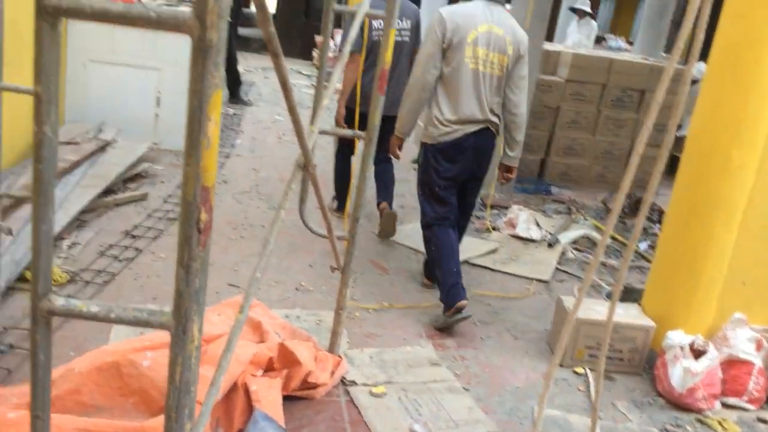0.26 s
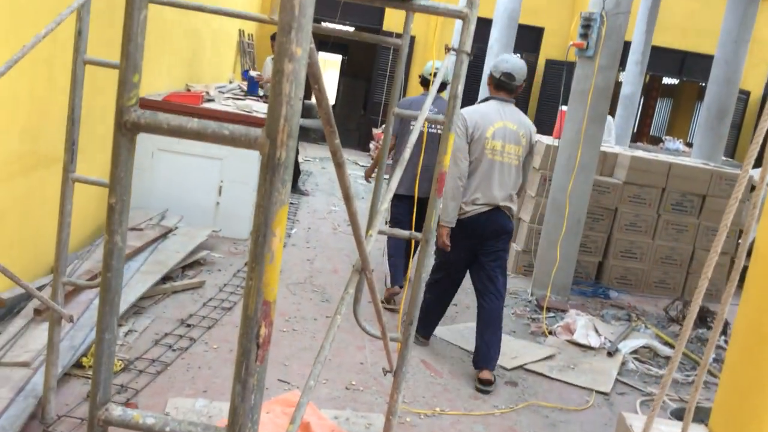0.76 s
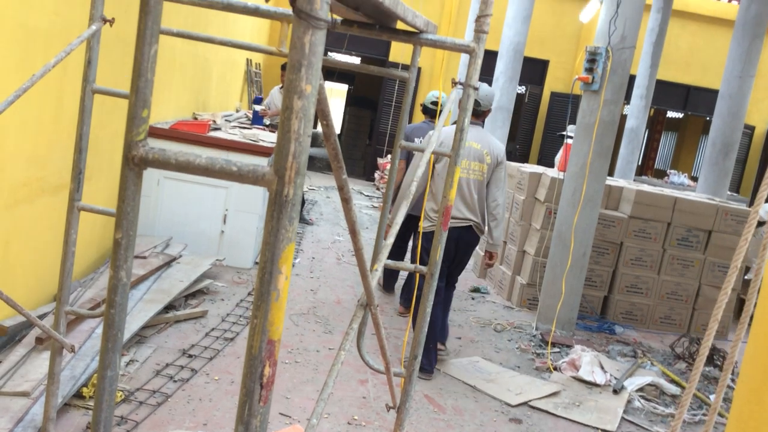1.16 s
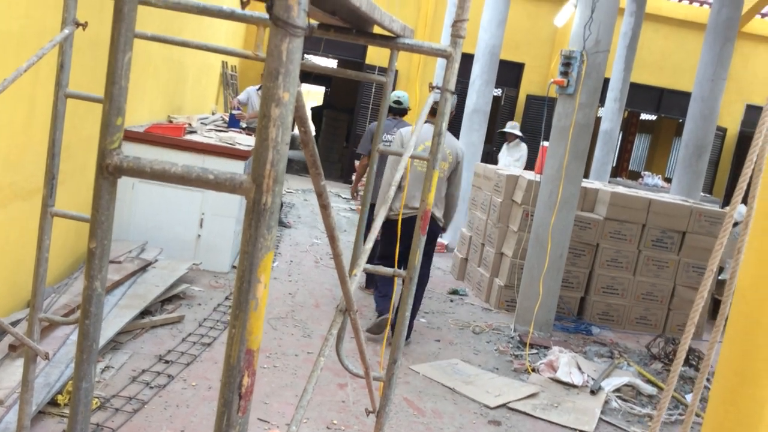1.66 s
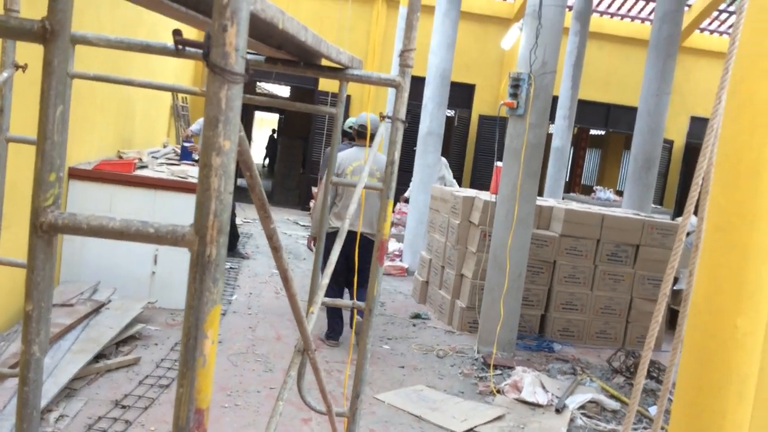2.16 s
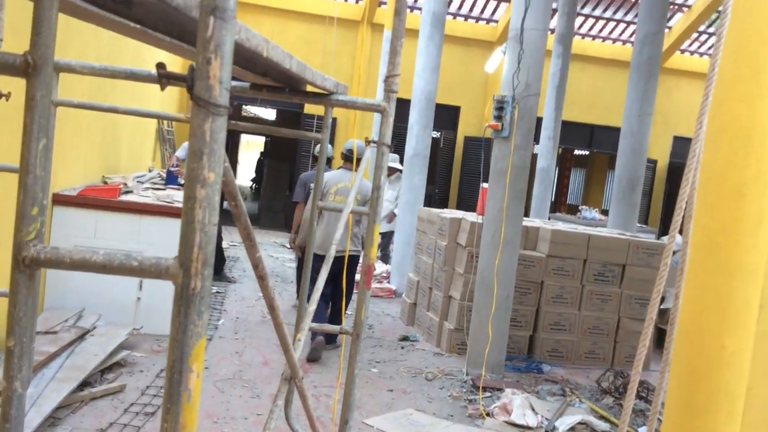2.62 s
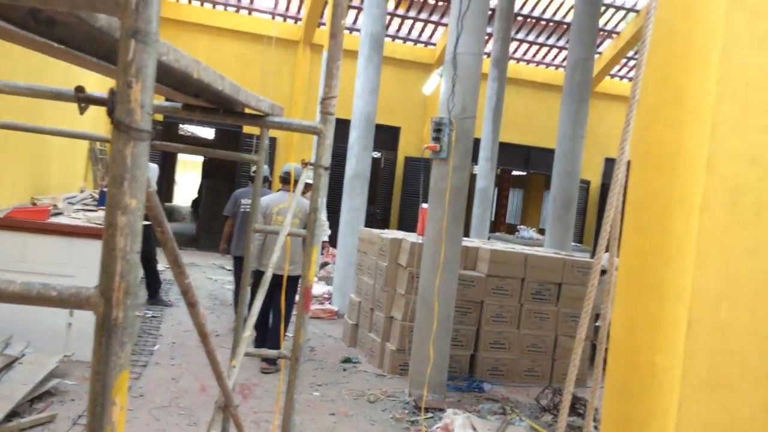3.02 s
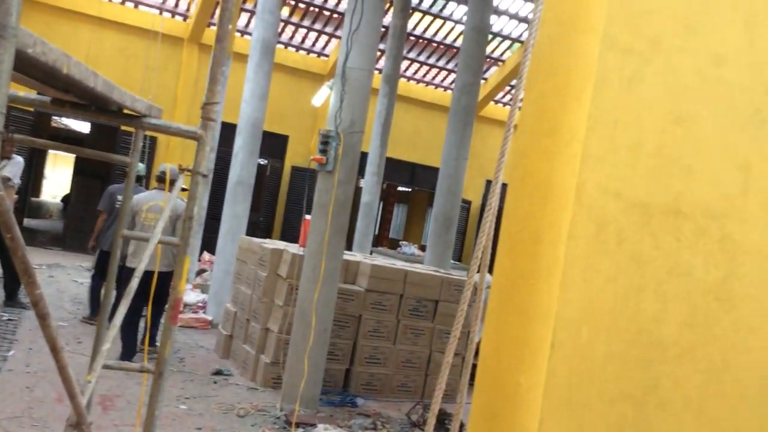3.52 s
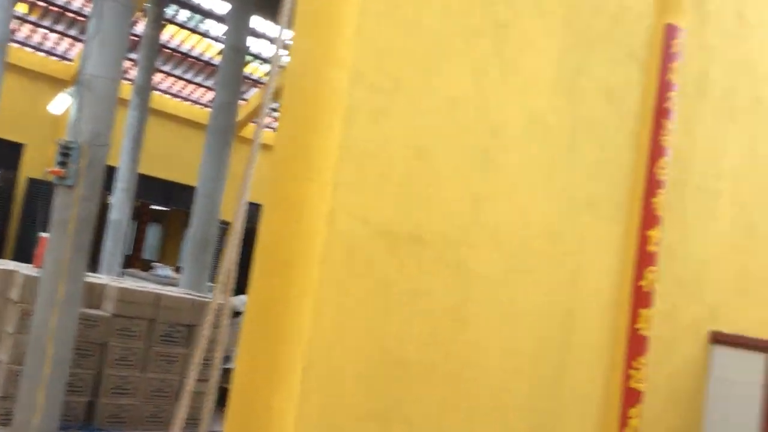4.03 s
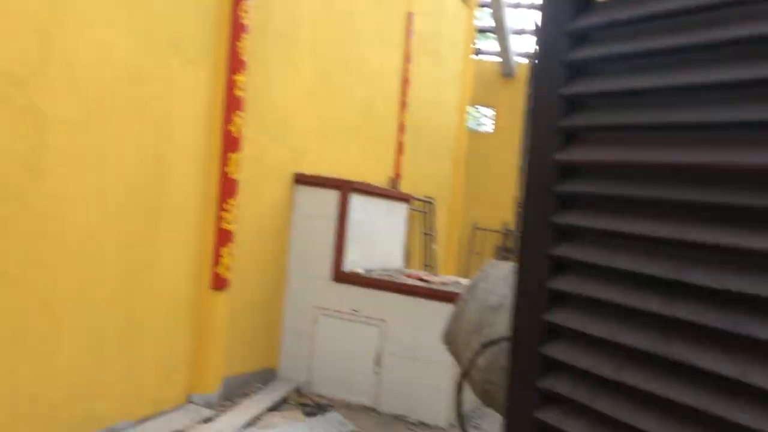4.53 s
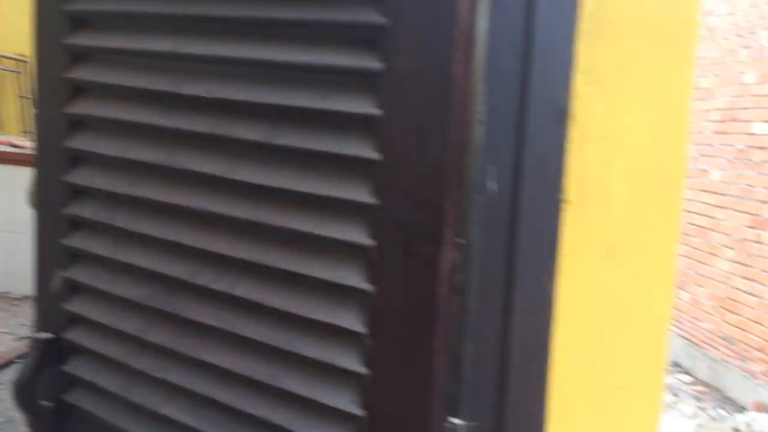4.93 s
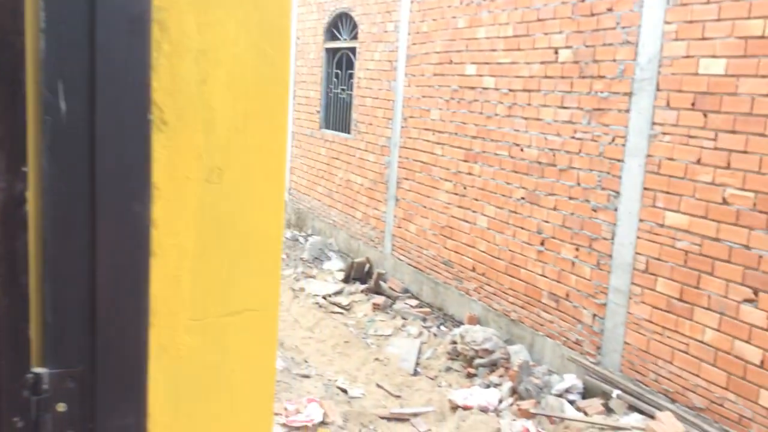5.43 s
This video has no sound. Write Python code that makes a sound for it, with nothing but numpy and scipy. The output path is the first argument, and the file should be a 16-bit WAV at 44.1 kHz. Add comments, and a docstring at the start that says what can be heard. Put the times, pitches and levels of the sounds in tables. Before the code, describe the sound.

Sharp, irregular hammering on timber rings in a bare building-site hall, with barely audible footsteps and grit scuffs under a quiet airy hiss.

```python
"""Sharp knocks, most likely a hammer on timber, ring through an unfinished hall on a building site.
A run on hollow boards, softer blows further off, then three bright ones on a solid piece close by.
Each blow is a noise crack with decaying modes and a diffuse echo. Shoes bump and scrape faintly on grit
as bursts of shaped noise, and a last long, soft swell of hiss is made alike. Two very faint, thin high
tones are sines that slide down, and the site's hiss is coloured noise."""
import sys
import numpy as np
from scipy import signal
from scipy.fft import rfft, irfft, next_fast_len
from scipy.io import wavfile
from scipy.ndimage import uniform_filter1d

SR = 44100
rng = np.random.default_rng(int(sys.argv[2]) if len(sys.argv) > 2 else 0)


def generate_wav(signal):
    """Clip the signal to [-1, 1] and save it as 16-bit WAV at the path in sys.argv[1]."""
    frames = np.transpose(np.atleast_2d(signal))
    scaled = np.clip(frames, -1, 1) * 32767
    pcm = np.round(scaled).astype(np.int16)
    wavfile.write(sys.argv[1], SR, pcm)


N = 250488
RING = SR * 2 // 3  # samples kept of each blow
AGE = np.arange(RING) / SR  # time since a contact, s

# Hammer blows and light placing taps on the hollow boards.
# Each row: start in seconds, level in dB, snap (treble lift) in dB, knock in Hz, knock gain in dB.
BOARD_BLOWS = [(-0.012, -18.5, -9, 177, 4.5), (0.3475, -15, 3, 1220, 1), (0.6703, -14, -1.5, 885, 4),
               (0.9425, -17.5, 3, 950, 5.5), (1.179, -37, -28, 1010, -1), (1.381, -36.5, -4.5, 920, 1.5),
               (1.602, -32.5, -3, 550, 8), (1.6235, -16, -1, 900, 7.5), (1.787, -36, -10, 860, 5),
               (1.853, -20.5, 2, 654, 0.5), (1.962, -32, -1, 1010, 0.5)]
# Blows on the distant timber. Each row: start in seconds, level in dB, snap in dB, knock in Hz, its gain in dB.
FAR_BLOWS = [(2.906, -27, -11.5, 1400, 4), (3.174, -26.5, -10, 496, 1), (3.396, -36, -22, 1070, 9),
             (3.412, -26, -9.5, 1080, 2.5)]
# Blows on the nearby beam. Each row: start in seconds, level in dB, snap in dB, knock in Hz, its gain in dB.
BEAM_BLOWS = [(4.7605, -23, 4.5, 750, 9.5), (5.149, -19.5, 7, 2590, 1.5), (5.512, -18, 10.5, 498, 6)]
# A light placing tap before the far blows, then heels landing on the floor. Each row: start in seconds, level
# in dB, snap in dB, knock in Hz, its gain in dB.
TAP_AND_HEELS = [(2.605, -42, 13, 690, 17), (4.378, -38.5, 11.5, 370, 6), (4.968, -48, -2, 190, 1)]
# Soles scraping over grit, and a last long, soft swell of hiss.
# Each row: middle in seconds, level in dB, spread (Gaussian sigma) in seconds.
SCUFFS_AND_SWELL = [(1.471, -48, 0.023), (1.963, -43.5, 0.082), (2.465, -53, 0.01), (2.67, -50.5, 0.049),
                    (3.938, -53, 0.14), (5.345, -50, 0.2)]
# Single bits of grit cracking. Each row: start in seconds, level in dB, centre in Hz.
GRIT = [(2.015, -51.5, 8800), (2.342, -56, 9400), (4.044, -44.5, 5000)]
# Spectrum of the crowd of short-lived modes of the boards. Each row: frequency in Hz, relative level in dB.
BOARD_SPECTRUM = [(60, -27), (120, -11), (168, 1), (228, -2.5), (295, -3), (360, -4), (660, -3),
                  (900, -5.5), (1100, -6), (2300, -6.5), (3700, -8), (5000, -17.5), (9500, -27.5),
                  (16000, -44.5)]
# The same for the distant timber. Each row: frequency in Hz, relative level in dB.
FAR_SPECTRUM = [(60, -14), (165, 3), (235, -1.5), (400, -3), (660, -2.5), (830, -6), (1100, -4),
                (2200, -11), (2700, -9.5), (5100, -13), (8100, -17), (16000, -35)]
# The same for the nearby beam. Each row: frequency in Hz, relative level in dB.
BEAM_SPECTRUM = [(60, -26), (155, -4.5), (200, -6.5), (420, -3.5), (540, -5.5), (880, -10.5), (1100, -4.5),
                 (1800, -11), (2550, -4.5), (3000, -10.5), (4000, -10.5), (5400, -17.5), (9400, -27),
                 (16000, -52)]
# The same for heel and floor. Each row: frequency in Hz, relative level in dB.
HEEL_SPECTRUM = [(35, -32), (60, -2), (198, 7), (503, -18), (682, -14), (841, -26), (1510, -11),
                 (5090, -28), (16000, -50)]
# Modes that stand out on the boards. Each row: mean frequency in Hz, relative level in dB, t60 in seconds.
BOARD_MODES = [(170.5, 3.5, 0.35), (296, 2.5, 0.16), (528, -9.5, 0.2), (660, -3.5, 0.27), (874, 4.5, 0.064),
               (1259, -6, 0.17), (1472, -6, 0.19), (1597, -11, 0.4), (2140, -14, 0.66), (2353, -11.5, 0.37),
               (3200, -28, .25), (3500, 2, 0.045), (3710, -0.5, 0.079)]
# Modes of the distant timber. Each row: mean frequency in Hz, relative level in dB, t60 in seconds.
FAR_MODES = [(400, 1, 0.39), (474, -8, 0.6), (675, -2.5, 0.47), (1138, -4, 0.25), (1695, -6, 0.15),
             (2630, -5, 0.13)]
# Modes of the nearby beam. Each row: mean frequency in Hz, relative level in dB, t60 in seconds.
BEAM_MODES = [(295.6, -9.5, 0.37), (400, 0.5, 0.12), (545.5, 5, 0.092), (760, -5, 0.072), (1140, -32, 0.17),
              (2270, -20, 0.14), (2580, -20, 0.058), (3270, -17, .15), (3755, -4, 0.036), (4160, 5, 0.024),
              (4370, -24, 0.068)]
# Echo of the hall. Each row: band in Hz, relative share in dB, t60 in seconds before each place stretches it.
HALL = [(59, -9, 1), (162, 4.5, 0.79), (400, 3.5, 0.71), (1020, 2, 0.64), (2170, 2.5, 0.7),
        (4570, -2, 0.69), (9500, 1, 0.49), (16000, -21, 0.57)]
# Spectrum of the site's air. Each row: frequency in Hz, relative density in dB per Hz.
AIR_SPECTRUM = [(15, -60), (25, -24), (53, -1), (145, -7), (180, -5.5), (363, -7), (489, -13), (575, -12.5),
                (1790, -12), (1940, -12), (4030, -18.5), (9310, -27.5), (16000, -45)]
# Level of the air, lowest in the middle and rising at the open doorway. Each row: time in seconds, level in dB.
AIR_LEVEL = [(1.4, -49), (2.3, -53.5), (4.3, -53), (5.4, -49.5), (5.68, -44)]
# Very faint, thin high tones that slide down.
# Each row: start in seconds, length in seconds, start in Hz, end in Hz, peak level in dB.
THIN_TONES = [(4.58, 0.15, 9600, 9200, -67), (4.65, 0.051, 5400, 5000, -58)]

# a weaker blow loses bite and a little bass: dB of treble and of bass per dB of level
BITE_DB_PER_DB, THUMP_DB_PER_DB = 0.97, 0.05
# finer grit cracks at random moments
FINE_GRIT_COUNT, FINE_GRIT_DB, FINE_GRIT_HZ = 7, -60.5, 9500
TOP_HZ = 16100  # upper limit of the recorder


def undb(db):
    """Decibels to gain."""
    return 10 ** (np.asarray(db) / 20)


def unit(x):
    """Scale to rms 1."""
    return x / np.sqrt(np.mean(x ** 2))


def on_log(hz, points, values):
    """Read a curve on a log-frequency axis."""
    return np.interp(np.log(np.maximum(hz, 1)), np.log(points), values)


def colour(x, points, db):
    """Filter by a smooth spectrum, causally (minimum phase), so that attacks stay sharp."""
    size = next_fast_len(len(x) + SR // 10, True)
    size += size % 2
    bins = np.fft.rfftfreq(size, 1 / SR)
    # folding the cepstrum onto positive times gives minimum phase
    cepstrum = irfft(np.log(undb(on_log(bins, points, db))))
    cepstrum[1:size // 2] *= 2
    cepstrum[size // 2 + 1:] = 0
    response = np.exp(rfft(cepstrum))
    return irfft(rfft(x, size) * response)[:len(x)]


def fade(t60):
    """Exponential decay, 60 dB down after t60."""
    return np.exp(-np.log(1000) * AGE / t60)


def add(out, s, sound):
    """Mix a sound in from time s, dropping whatever falls outside."""
    start = int(round(s * SR))
    sound, start = sound[max(-start, 0):], max(start, 0)
    out[start:start + len(sound)] += sound[:len(out) - start]


def hall_tail(stretch):
    """Diffuse echo of one impulse: noise bands build up together, then each dies at its own rate."""
    hz, share_db, t60 = np.transpose(HALL)
    noise = rfft(rng.standard_normal(RING))
    bins = np.fft.rfftfreq(RING, 1 / SR)
    bands = [irfft(noise * on_log(bins, hz, pick)) for pick in np.eye(len(hz))]
    tail = sum(band * undb(db) * fade(t * stretch) for band, db, t in zip(bands, share_db, t60))
    return tail * (1 - np.exp(-AGE / 0.009))


def ring_mode(hz, db, t60, swing_cycles):
    """One clear mode: a decaying sine that takes a number of cycles to swing up."""
    # each mode's pitch, share and phase vary at random from blow to blow
    detune, share, turn = rng.standard_normal(3)
    swing = np.sin(2 * np.pi * (hz * (1 + 0.0049 * detune) * AGE + turn))
    swing_up = 1 - np.exp(-(AGE * hz / swing_cycles) ** 2)
    return undb(db + 2.9 * share) * swing * swing_up * fade(t60)


def strikes(blows, body, modes, rise_s, body_t60, modes_db, swing_cycles, hall_db, stretch, low_cut_hz,
            firm_db, thump_db):
    """Each blow sets off a dense, fast-dying crack, any clear modes and the hall; below firm_db it dulls."""
    out = np.zeros(N)
    attack = slice(0, SR // 25)  # levels are set over the first 40 ms
    own = rng.standard_normal(RING)  # the part of the crack that is alike each time
    # a steep low cut thins the bass
    low_cut = signal.butter(4, low_cut_hz, "high", fs=SR, output="sos")
    for s, db, snap_db, knock_hz, knock_db in blows:
        crack = own + rng.standard_normal(RING)
        crack *= fade(body_t60) * (1 - np.exp(-AGE / rise_s))
        sound = colour(crack + undb(hall_db) * hall_tail(stretch), *np.transpose(body))
        sound /= np.std(sound[attack])
        for hz, mode_db, t60 in modes:
            sound += ring_mode(hz, modes_db + mode_db, t60, swing_cycles)
        # each spot has its own hollow knock
        knock = signal.lfilter(*signal.iirpeak(knock_hz, 4.5, fs=SR), sound)
        sound += (undb(knock_db) - 1) * knock
        # a harder hit has more bass and bite, a squarer one more snap
        bass_db = thump_db + THUMP_DB_PER_DB * (db - firm_db)
        bite_db = BITE_DB_PER_DB * (db - firm_db)
        sound = colour(sound, [170, 400, 1100, 3000, 8500], [bass_db, 0, 0, bite_db, snap_db])
        sound = signal.sosfilt(low_cut, sound)
        add(out, s, undb(db) * sound / np.std(sound[attack]))
    return out


def hollow_boards():
    """Hammer on hollow boards: a long crack and many clear modes."""
    return strikes(BOARD_BLOWS, BOARD_SPECTRUM, BOARD_MODES, rise_s=0.0011, body_t60=0.16,
                   modes_db=-3.5, swing_cycles=2.37, hall_db=-7.5, stretch=0.95, low_cut_hz=105,
                   firm_db=-15.5, thump_db=-1.5)


def air():
    """Hiss and rumble of the open building: steady coloured noise under a slowly moving level."""
    hiss = unit(colour(rng.standard_normal(N), *np.transpose(AIR_SPECTRUM)))
    return hiss * undb(np.interp(np.arange(N) / SR, *np.transpose(AIR_LEVEL)))


def tap_and_heels():
    """A light tap before the far blows, then heels bumping the floor: short, damped cracks without clear modes."""
    return strikes(TAP_AND_HEELS, HEEL_SPECTRUM, [], rise_s=0.0013, body_t60=0.044,
                   modes_db=0, swing_cycles=1, hall_db=-14.5, stretch=0.69, low_cut_hz=81,
                   firm_db=-41, thump_db=-3.0)


def scuffs_and_swell():
    """Soles roll over many small grains, and a last soft hiss swells: uneven noise that comes and goes."""
    t = np.arange(N) / SR
    swell = sum(undb(db) * np.exp(-.5 * ((t - s) / spread) ** 2) for s, db, spread in SCUFFS_AND_SWELL)
    grain_db = 3 * np.minimum(rng.exponential(size=N), 6)
    grains = rng.standard_normal(N) * undb(grain_db)
    scrape = colour(grains, [200, 1200, 3200, 9000, 16000], [-1.0, 5.5, 4, -4.0, -19.0])
    return swell * unit(scrape)


def grit():
    """Now and then a grain cracks: a narrow burst of noise with a quick and a weaker slow decay."""
    out = np.zeros(N)
    fine = [(s, FINE_GRIT_DB, FINE_GRIT_HZ) for s in rng.uniform(0, N / SR, FINE_GRIT_COUNT)]
    for s, db, hz in GRIT + fine:
        snap = rng.standard_normal(RING) * (fade(0.033) + undb(-10) * fade(0.34))
        snap = colour(snap, [hz / 6, hz, hz * 2.8], [-22, 0, -26])
        add(out, s, undb(db) * snap / np.std(snap[:SR // 50]))
    return out


def far_timber():
    """Hammer on timber further off: a softer onset and modes that are slow to swing up."""
    return strikes(FAR_BLOWS, FAR_SPECTRUM, FAR_MODES, rise_s=0.0025, body_t60=0.13,
                   modes_db=-7.0, swing_cycles=8.7, hall_db=-11.5, stretch=1.155, low_cut_hz=115,
                   firm_db=-23.0, thump_db=-4)


def thin_tones():
    """Two very faint, thin high tones that slide down: sines with a slightly unsteady pitch."""
    out = np.zeros(N)
    for s, length, start_hz, end_hz, db in THIN_TONES:
        along = np.minimum(AGE / length, 1)
        waver = unit(uniform_filter1d(rng.standard_normal(RING), size=90))
        hz = (start_hz + (end_hz - start_hz) * along) * (1 + 0.0107 * waver)
        tone = np.sin(2 * np.pi * np.cumsum(hz) / SR)
        add(out, s, undb(db) * np.sin(np.pi * along) * tone)
    return out


def near_beam():
    """Hammer on a solid beam close by: a quick onset, a short crack and strong modes."""
    return strikes(BEAM_BLOWS, BEAM_SPECTRUM, BEAM_MODES, rise_s=0.0007, body_t60=0.064,
                   modes_db=0.0, swing_cycles=1.0, hall_db=-6.5, stretch=0.56, low_cut_hz=85,
                   firm_db=-24, thump_db=6.5)


def scene():
    """Hammering, floor sounds, thin tones and air at one microphone."""
    hammering = hollow_boards() + far_timber() + near_beam()
    floor = tap_and_heels() + scuffs_and_swell() + grit()
    return (hammering + floor + thin_tones() + air())[None]


def record(dry):
    """The phone rounds the highest peaks and cuts the top."""
    ceiling = 0.87  # of full scale
    rounded = ceiling * np.tanh(dry / ceiling)
    top_cut = signal.ellip(8, .2, 70, TOP_HZ, fs=SR, output="sos")
    return signal.sosfilt(top_cut, rounded)


dry = scene()
out = record(dry)
generate_wav(out)
```